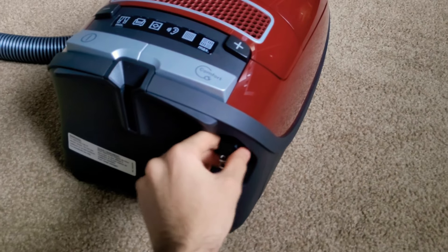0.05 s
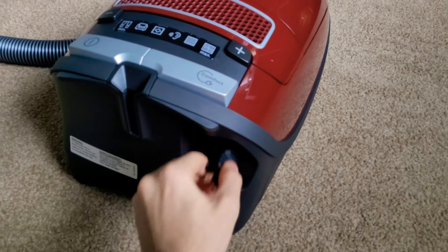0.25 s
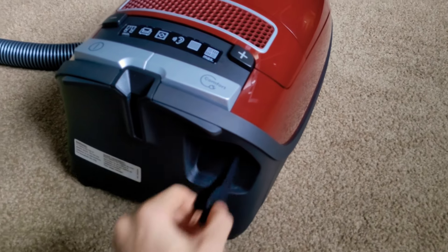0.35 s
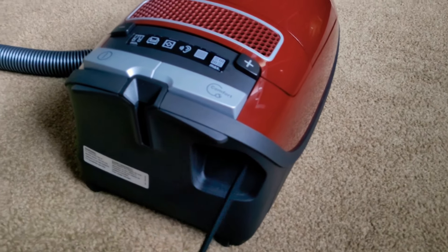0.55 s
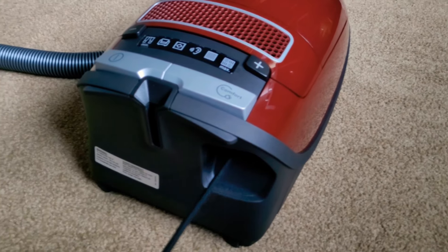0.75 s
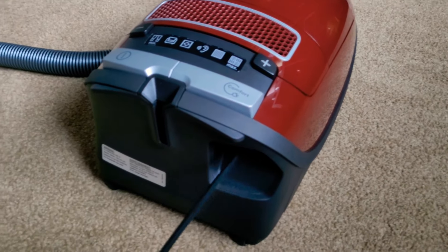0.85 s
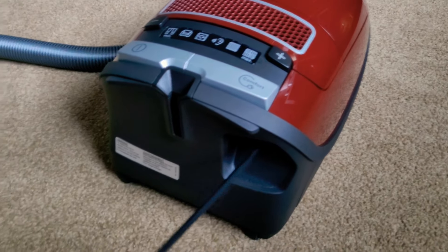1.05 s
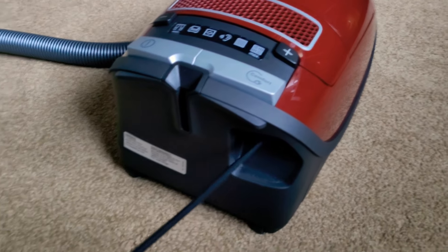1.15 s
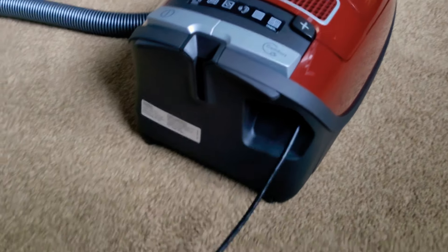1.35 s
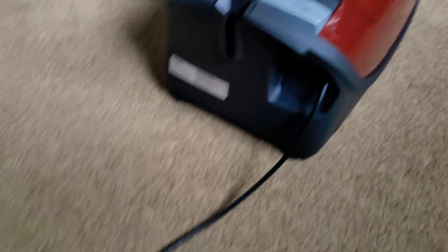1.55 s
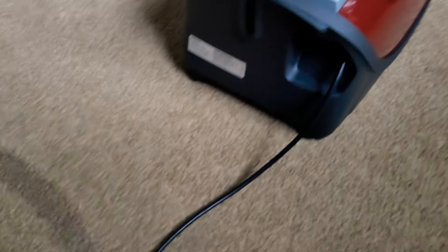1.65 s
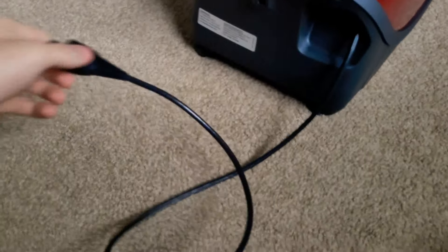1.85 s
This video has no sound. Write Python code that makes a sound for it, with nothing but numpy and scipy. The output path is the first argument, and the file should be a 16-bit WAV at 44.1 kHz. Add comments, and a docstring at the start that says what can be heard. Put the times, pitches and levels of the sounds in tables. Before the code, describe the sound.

A vacuum cleaner cord is pulled out in one draw, close by in a quiet carpeted room. The plug rattles free, the reel rasps and knocks with a thin spring ring, then slows and latches with two clacks.

```python
"""Vacuum cleaner cord, pulled out.

One long draw, close by, in a quiet carpeted room with a low hum. The plug rattles free.
Stick-slip friction of the reel drives its plastic housing, its drum and a spring ringing near 2.4 kHz.
The reel knocks once a turn, slows and latches with two clacks; the hollow housing thumps.
The sliding cord hisses, whistles faintly and slaps the carpet softly twice."""
import sys
import numpy as np
from scipy import signal
from scipy.fft import rfft, irfft, next_fast_len
from scipy.io import wavfile
from scipy.ndimage import map_coordinates

SR = 44100
rng = np.random.default_rng(int(sys.argv[2]) if len(sys.argv) > 2 else 0)


def master(y):
    """Save y as 16-bit WAV."""
    cut = np.clip(np.atleast_2d(y).T, -1, 1)
    pcm = np.round(cut * 32767)  # scale
    wavfile.write(sys.argv[1], SR, pcm.astype(np.int16))


N = 83790

# hum partials: f/Hz, level/dB
HUM_PARTIALS = [(58.4, -74.5), (116.8, -62), (175, -77), (233.5, -74)]
# slow swell of the hum: t/s, gain/dB
HUM_SWELL = [(0, -7), (.11, -0.5), (.5, 8.5), (1.1, -3.5), (1.45, 3), (1.6, -8.5), (1.78, 2), (1.9, -15)]
# room air: f/Hz, level/dB
AIR_SPECTRUM = [(20, -13), (50, 3), (100, 2), (170, -6.5), (300, -6.5), (500, -18.5), (1200, -31),
                (4000, -36.5), (15000, -33.5)]

# soft rubs, in order plug, hand, carpet: t/s, half length/s, level/dB
RUBS = [(0.141, 0.026, -59.5), (1.37, 0.11, -62.5), (1.872, 0.058, -66.5)]
# fingers on the plug: f/Hz, level/dB
PLUG_RUB_SPECTRUM = [(150, 3), (350, 7), (520, -3.5), (750, -2.5), (1200, -11.5), (1700, -23), (3000, -21),
                     (4200, -35.5), (15000, -32)]
# cord through the hand: f/Hz, level/dB
HAND_RUB_SPECTRUM = [(2000, -27), (6000, -18), (10000, -4), (13000, 2), (15000, 1.5)]
# slack cord on the carpet: f/Hz, level/dB
CARPET_RUB_SPECTRUM = [(150, -2.5), (400, 3), (800, -1.5), (2200, -0.5), (4500, -10), (7500, -8.5),
                       (9000, -12), (15000, -10.5)]
# cord whistles: start t/s, end t/s, start f/Hz, middle f/Hz, end f/Hz
WHISTLE_GLIDES = [(1.16, 1.42, 14400, 15050, 14800), (1.25, 1.41, 13600, 14500, 14000),
                  (1.41, 1.52, 15000, 14900, 13900), (1.43, 1.53, 12700, 11900, 10700),
                  (1.5, 1.595, 15000, 13600, 10600), (1.48, 1.58, 4400, 4150, 3500)]
# one per whistle: level/dB
WHISTLE_LEVELS_DB = [-63, -62, -72, -68.5, -75.5, -75]

# dull thumps (blows on the housing, then two soft slaps of cord on carpet): t/s, level/dB, favoured f/Hz
THUMPS = [(.2308, -24.5, 351), (.2336, -30.5, 353), (0.2365, -29.5, 350), (.283, -23.5, 286),
          (0.3044, -24, 285), (.336, -25, 330), (0.608, -25.5, 320), (.688, -32.5, 360), (0.804, -29, 290),
          (.972, -25, 329), (1.393, -34, 281), (1.4411, -29, 393), (1.4482, -31.5, 293), (1.498, -39, 220),
          (1.52, -35, 220)]
# housing modes, used for all thumps: f/Hz, level/dB, T60/s
THUMP_MODES = [(216, -12, 0.044), (294.5, 1, .09), (311, -10, 0.15), (349, -3.5, 0.073), (411, -2.5, 0.085),
               (447, -5.5, .08), (612, -15, 0.11), (770, -19, .05), (1160, -12.5, 0.078),
               (1338, -9.5, 0.046)]
# plug and latch clicks: t/s, level/dB, hold/s, tilt/(dB/oct), low edge f/Hz
CLICKS = [(0.2302, -45.5, 0.0052, -6, 1000), (0.237, -45.5, 0.00076, 6.5, 890),
          (0.2876, -45.5, 0.00092, -1.5, 500), (0.3143, -38, 0.0044, 2, 600), (0.328, -35, 0.0061, 1, 700),
          (1.3906, -33.5, 0.001, -1, 1454), (1.403, -44, 0.0018, -4, 806),
          (1.4352, -37.5, 0.0032, -2.5, 750), (1.448, -46, 0.0023, -5.5, 798),
          (1.589, -68, .003, -13.5, 1090)]
# hard plastic click: f/Hz, level/dB
CLICK_SPECTRUM = [(200, -3.5), (700, 2), (1000, -0.5), (1300, 3), (1600, 1), (1950, 1), (2800, -8.5),
                  (4000, -4.5), (5500, -14.5), (7500, -11), (10000, -20), (15000, -16.5)]
# one reel knock per turn: t/s, level/dB, hold/s, tilt/(dB/oct)
TURN_KNOCKS = [(0.324, -36.5, 0.012, 0), (.481, -31, 0.0032, -0.5), (0.598, -32, 0.0048, -0.5),
               (0.6835, -26.5, 0.0047, -1.5), (0.789, -34, 0.005, 0.5), (0.87, -30.5, 0.003, -1.5),
               (0.964, -31, 0.0073, -.5), (1.061, -37.5, 0.005, -0.5), (1.1706, -35.5, 0.0053, -1.5)]
# reel knock: f/Hz, level/dB
KNOCK_SPECTRUM = [(100, -9.5), (300, 13), (480, 2.5), (900, 9.5), (1500, -1), (2600, 2.5), (4200, -6),
                  (8000, -12), (15000, -22.5)]

# course of the pull: t/s, housing rumble/dB, rasp/dB, spring ring/dB, cord hiss/dB
PULL_LEVELS = [(0.233, -77, -85, -59, -79), (.242, -38.5, -51.5, -58, -64.5), (.275, -50, -59.5, -78, -85),
               (.308, -43, -54.5, -73, -63), (0.333, -35, -44.5, -78, -52), (.385, -44, -50, -76, -64.5),
               (.415, -45, -46.5, -57, -67), (.45, -40, -45.5, -48, -56), (.57, -41, -44.5, -40.5, -51.5),
               (.66, -37.5, -41, -48.5, -43.5), (.75, -39, -42, -44.5, -52),
               (.82, -38.5, -41, -43.5, -44.5), (.85, -42.5, -45.5, -50.5, -53),
               (.885, -39, -39, -39.5, -51.5), (.93, -38.5, -43, -44.5, -46.5),
               (1.1, -39.5, -42, -42, -50.5), (1.17, -40.5, -49.5, -44.5, -57.5),
               (1.23, -47, -46.5, -46, -61), (1.26, -47.5, -54.5, -62, -63.5),
               (1.299, -56.5, -60.5, -64, -64.5), (1.375, -65.5, -69.5, -66.5, -64),
               (1.46, -53, -61.5, -66, -66), (1.521, -62, -70, -95, -73), (1.62, -82.5, -88.5, -110, -91)]
# housing rumble: f/Hz, level/dB
RUMBLE_SPECTRUM = [(30, -47.5), (58, -18.5), (95, -20.5), (143, -1.5), (195, -17.5), (262, 0.5), (350, 0.5),
                   (430, -1), (520, -6.5), (640, -8.5), (760, -25.5), (2000, -61)]
# reel rasp: f/Hz, level/dB
RASP_SPECTRUM = [(200, -29), (550, -5), (900, 2.5), (1200, 2), (2000, 1), (2900, -3.5), (3350, -13.5),
                 (4150, -6.5), (4700, -27.5), (8000, -27), (15000, -45)]
# cord in its slot: f/Hz, level/dB
HISS_SPECTRUM = [(1000, -23), (3000, 3), (5200, -1), (6300, -2.5), (7900, 3.5), (8700, -6), (9800, -5),
                 (12500, -7.5), (15000, -9)]
# spring resonances: f/Hz, bandwidth/Hz, level/dB
SPRING_MODES = [(2392, 66, -1.5), (2473.5, 46, 4), (2580, 52, -13)]
# drum resonances: f/Hz, bandwidth/Hz, level/dB
DRUM_MODES = [(661, 7.4, -2), (888, 25, -4.5), (903, 83, -2), (936, 10, 3.5), (1050, 12, -7.5),
              (1416, 18, -3), (1513, 100, 8), (1920, 53, -7), (3090, 48, -16.5), (3840, 80, -18.5),
              (4120, 79, -22.5), (5110, 89, -4), (6700, 43, -15.5), (7850, 30, -16.5)]

# stereo width of noise: f/Hz, side over mid/dB
SIDE_SPECTRUM = [(60, -4), (180, -39), (380, -9.5), (700, -11), (1300, -2.5), (2400, -6), (4400, 2.5),
                 (15000, -3.5)]
# stereo balance: f/Hz, left over right/dB
BALANCE = [(60, -2.5), (200, 4), (380, -3), (700, 2), (1300, 0), (2400, -3.5), (4400, -1), (8000, -1.5),
           (15000, -1)]
# lead of the left channel: f/Hz, phase/rad
PHASE_LEAD = [(60, .03), (350, 0.23), (900, 0.64), (2400, 0.92), (3500, 0.11)]


def undb(db):
    """Decibels to gain."""
    return 10 ** (np.asarray(db) / 20)


def unit(x):
    """Stereo pair scaled to mid rms 1."""
    return x / (np.std(x.mean(axis=0)) + 1e-12)


def colour(x, spectrum):
    """Minimum-phase filter through (f/Hz, level/dB) points."""
    count = x.shape[-1]
    size = 2 * next_fast_len(count // 2 + 4096)
    hz, db = np.array(spectrum).T
    bins_hz = np.maximum(np.fft.rfftfreq(size, 1 / SR), 1)
    gain = undb(np.interp(np.log(bins_hz), np.log(hz), db))
    cepstrum = irfft(np.log(gain))
    cepstrum[1:size // 2] *= 2
    cepstrum[size // 2 + 1:] = 0
    return irfft(rfft(x, size) * np.exp(rfft(cepstrum)))[..., :count]


def tilted(spectrum, db_per_oct):
    """Spectrum with an added slope."""
    return [(hz, db + db_per_oct * np.log2(hz)) for hz, db in spectrum]


def resonate(x, modes):
    """Parallel band-pass resonances."""
    return sum(undb(db) * signal.lfilter(*signal.iirpeak(hz, hz / width_hz, fs=SR), x)
               for hz, width_hz, db in modes)


def noise(count=N):
    """Stereo noise: white mid, shaped side, widest in the treble."""
    mid, side = rng.standard_normal((2, count))
    side = colour(side, SIDE_SPECTRUM)
    return np.array([mid + side, mid - side])


def waver(rate_hz):
    """Smooth random curve, standard deviation 1."""
    knots = rng.standard_normal(N // 8)
    curve = map_coordinates(knots, [np.arange(N) * rate_hz / SR], order=3, mode="mirror")
    return curve / curve.std()


def swell(t, peak_s, half_s, db):
    """Gaussian rise and fall."""
    return undb(db) * np.exp(-0.5 * ((t - peak_s) / half_s) ** 2)


def background(t, waver_db=0.7, air_db=-67.5):
    """Low wavering hum and still room air."""
    hum = 0
    for hz, db in HUM_PARTIALS:
        amplitude = np.sqrt(2) * undb(db + waver_db * waver(rate_hz=7.7))
        hum += amplitude * np.sin(2 * np.pi * (hz * t + rng.random()))
    air = undb(air_db) * unit(colour(noise(), AIR_SPECTRUM))
    return hum * undb(np.interp(t, *np.array(HUM_SWELL).T)) + air


def room(x, t, t60_s=0.18, gap_s=0.004, wet_db=-7.5):
    """Direct sound plus the short tail of a carpeted room."""
    tail = noise() * (t > gap_s) * np.exp(-np.log(1000) * t / t60_s)
    tail /= np.sqrt(np.sum(tail ** 2) / 2)
    return x + undb(wet_db) * signal.fftconvolve(x, tail, axes=1)[:, :N]


def soft_rubs(t):
    """Fingers rub the plug; the cord brushes hand, then carpet."""
    spectra = PLUG_RUB_SPECTRUM, HAND_RUB_SPECTRUM, CARPET_RUB_SPECTRUM
    return sum(swell(t, *rub) * unit(colour(noise(), spectrum)) for rub, spectrum in zip(RUBS, spectra))


def body_boom(t, hz=58, width_hz=12):
    """The body booms softly as it is tugged along."""
    mode = [(hz, width_hz, 0)]
    boom = unit(resonate(resonate(noise(), mode), mode))
    return swell(t, peak_s=1.08, half_s=0.072, db=-57.5) * boom


def cord_whistles(t, width_hz=850, waver_hz=130):
    """Narrow noise bands from the sliding cord, sinking as it slows."""
    out = 0
    for (start_s, end_s, *glide_hz), db in zip(WHISTLE_GLIDES, WHISTLE_LEVELS_DB):
        progress = np.clip((t - start_s) / (end_s - start_s), 0, 1)
        parabola = np.polyfit([0, 0.5, 1], glide_hz, 2)
        hz = np.polyval(parabola, progress) + waver_hz * waver(rate_hz=20)
        phase = 2 * np.pi * np.cumsum(hz) / SR
        pair = [waver(width_hz) * np.cos(phase) + waver(width_hz) * np.sin(phase) for _ in range(2)]
        envelope = np.sqrt(np.abs(np.sin(np.pi * progress)))
        out += undb(db) * envelope * np.array(pair)
    return out


def dull_thumps(t, width_oct=0.25, base_share=0.17, low_cut_hz=200, pan_db=0.8):
    """Blows on the hollow housing, then two soft slaps of cord on carpet; each favours some modes."""
    out = np.zeros(N)
    for start_s, db, favoured_hz in THUMPS:
        age_s = np.maximum(t - start_s, 0)
        for hz, mode_db, t60_s in THUMP_MODES:
            share = base_share + np.exp(-(np.log2(hz / favoured_hz) / width_oct) ** 2)
            ring = np.sin(2 * np.pi * hz * age_s) * np.exp(-np.log(1000) * age_s / t60_s)
            out += 0.5 * share * undb(db + mode_db) * ring
    # a small housing radiates little bass
    low_cut = signal.butter(4, low_cut_hz, "high", fs=SR, output="sos")
    return signal.sosfilt(low_cut, out) * undb([[-pan_db], [pan_db]])


def plastic_impact(start_s, db, hold_s, decay_s, spectrum):
    """Plastic chatters on plastic briefly, then dies away."""
    count = SR // 8
    envelope = np.exp(-np.maximum(np.arange(count) / SR - hold_s, 0) / decay_s)
    chatter = noise(count)
    steady_rms = np.std(colour(chatter.mean(axis=0), spectrum))
    burst = undb(db) * colour(chatter * envelope, spectrum) / steady_rms
    return np.pad(burst, ((0, 0), (int(start_s * SR), N)))[:, :N]


def plug_and_latch(decay_s=0.0017):
    """Hard clicks: the plug rattles free, the latch catches."""
    out = 0
    for start_s, db, hold_s, tilt, edge_hz in CLICKS:
        spectrum = [(hz, level_db - 10 * np.log10(1 + (edge_hz / hz) ** 8))  # 4th-order low cut
                    for hz, level_db in tilted(CLICK_SPECTRUM, tilt)]
        out += plastic_impact(start_s, db, hold_s, decay_s, spectrum)
    return out


def reel_knocks(decay_s=0.0034, drum_db=-7.5):
    """The reel knocks once a turn and rings its drum."""
    knocks = sum(plastic_impact(start_s, db, hold_s, decay_s, tilted(KNOCK_SPECTRUM, tilt))
                 for start_s, db, hold_s, tilt in TURN_KNOCKS)
    return knocks + undb(drum_db) * resonate(knocks, DRUM_MODES)


def friction(slips_per_s=1100, spread_db=3, grain_s=0.00092, grain_share=0.43, judder_db=1.18):
    """Envelope of stick-slip grains over a smooth rub, juddering as the reel wobbles."""
    slips = rng.random(N) < slips_per_s / SR
    strength = undb(spread_db * np.minimum(rng.exponential(size=N), 4))
    power = signal.lfilter([1], [1, -np.exp(-1 / (grain_s * SR))], slips * strength ** 2)
    judder = undb(judder_db * waver(rate_hz=73))
    return np.sqrt(grain_share * power / power.mean() + 1 - grain_share) * judder


def reel_running(t, drum_db=-7.5, spring_hz=2474, spring_width_hz=600, spring_waver_db=2):
    """Reel friction drives housing, drum and spring; the cord rubs through its slot."""
    times_s, *levels_db = np.array(PULL_LEVELS).T
    gains = [undb(np.interp(t, times_s, db, left=-120, right=-120)) for db in levels_db]
    grains = friction()
    scrape = noise() * grains
    rumble = unit(colour(scrape, RUMBLE_SPECTRUM))
    drum = unit(resonate(noise() * grains, DRUM_MODES))
    rasp = unit(colour(scrape, RASP_SPECTRUM)) + undb(drum_db) * drum
    spring = resonate(noise() * grains, SPRING_MODES)
    spring = unit(resonate(spring, [(spring_hz, spring_width_hz, 0)]))  # trims the skirts
    spring *= undb(spring_waver_db * waver(rate_hz=35))
    hiss = unit(colour(noise() * grains, HISS_SPECTRUM))
    return sum(gain * layer for gain, layer in zip(gains, (rumble, rasp, spring, hiss)))


def scene():
    """The pull in the room, over the background."""
    t = np.arange(N) / SR
    pull = reel_running(t) + reel_knocks() + plug_and_latch() + dull_thumps(t)
    handling = cord_whistles(t) + soft_rubs(t) + body_boom(t)
    return room(pull + handling, t) + background(t)


def record(dry, top_hz=15450):
    """Small level and phase offsets between the channels; steep top cut."""
    octaves = np.log2(np.maximum(np.fft.rfftfreq(2 * N, 1 / SR), 1))
    balance_db, lead_rad = (np.interp(octaves, np.log2(hz), values)
                            for hz, values in (np.array(BALANCE).T, np.array(PHASE_LEAD).T))
    side = np.array([[0.5], [-0.5]])
    response = undb(side * balance_db) * np.exp(1j * side * lead_rad)
    pair = irfft(rfft(dry, 2 * N) * response)[:, :N]
    return signal.sosfilt(signal.ellip(10, 0.2, 70, top_hz, fs=SR, output="sos"), pair)


dry = scene()
out = record(dry)
master(out)
```